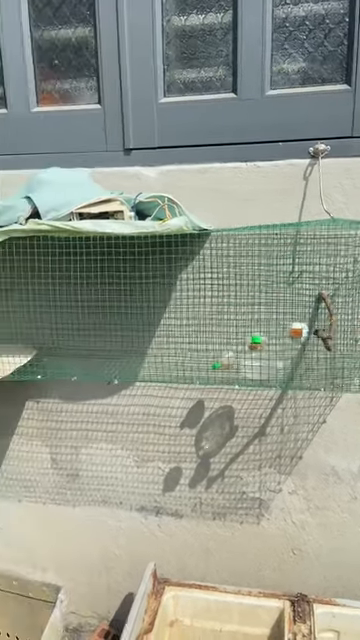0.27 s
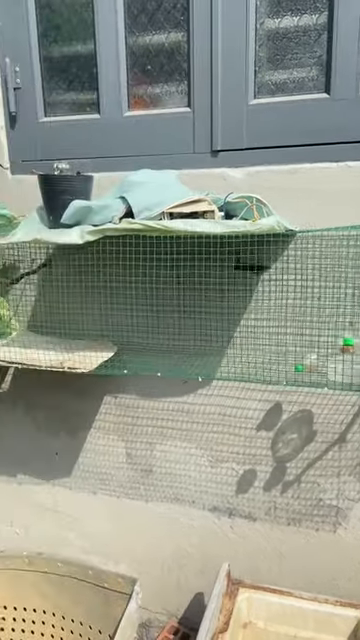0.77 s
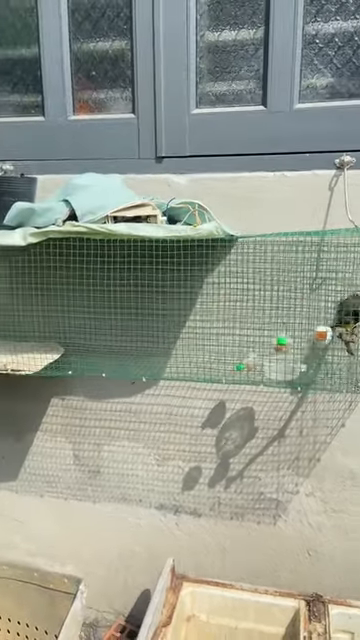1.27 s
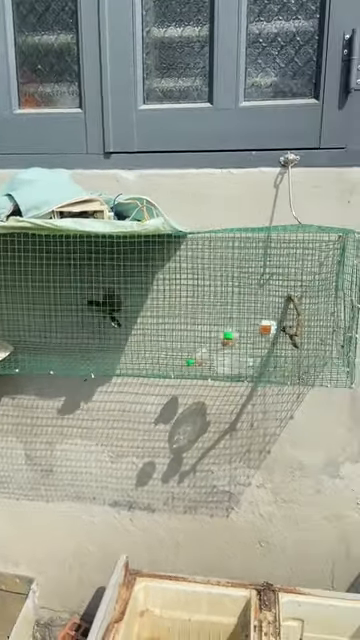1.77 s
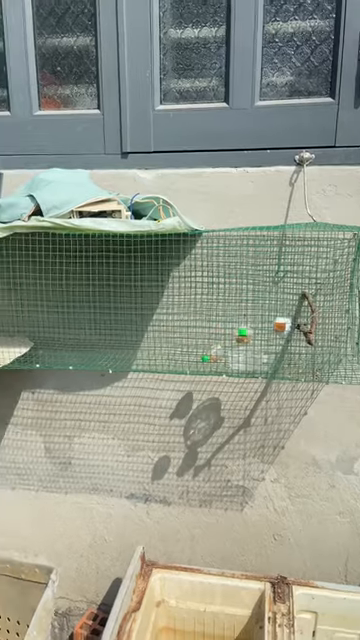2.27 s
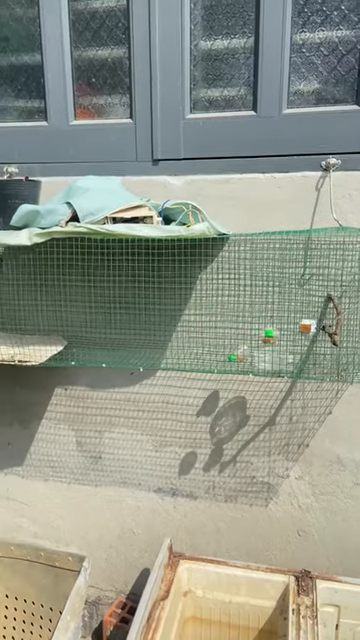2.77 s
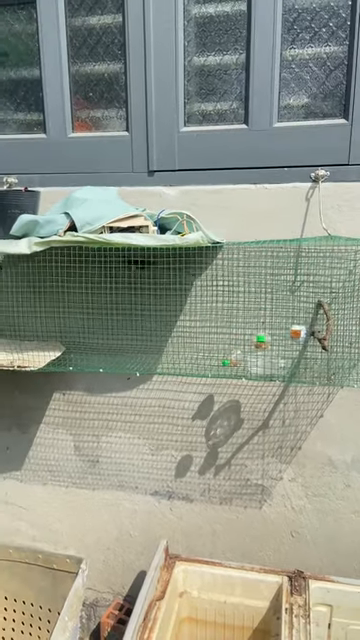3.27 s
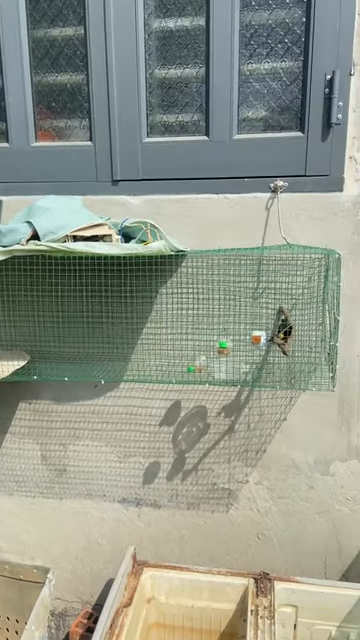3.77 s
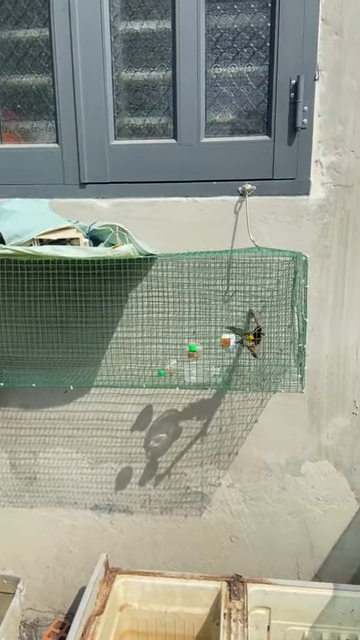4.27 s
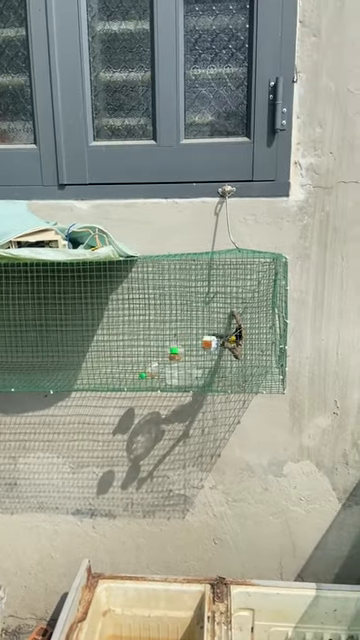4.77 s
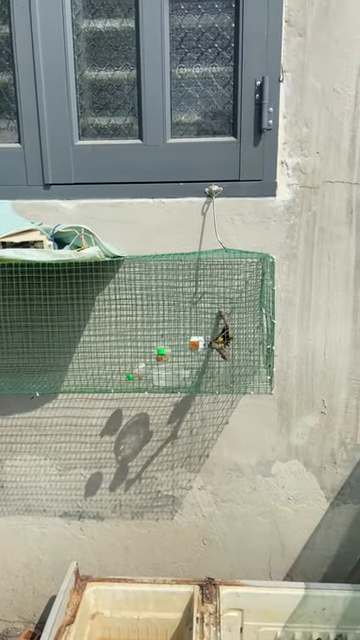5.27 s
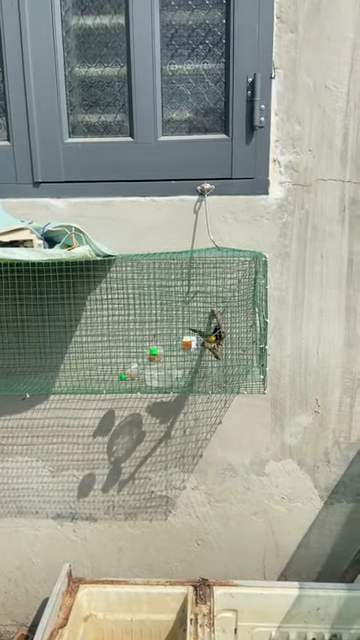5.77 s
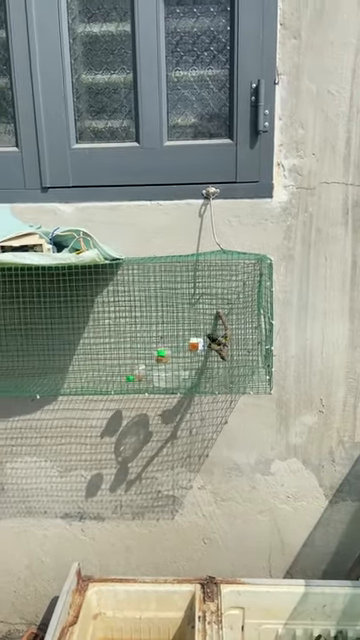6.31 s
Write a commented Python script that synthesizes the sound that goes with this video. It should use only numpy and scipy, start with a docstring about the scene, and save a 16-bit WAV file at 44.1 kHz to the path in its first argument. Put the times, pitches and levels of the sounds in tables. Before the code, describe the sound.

A small caged bird sings nearby in a yard, its notes echoing lightly off a wall, over a steady low town rumble and faint far bird calls. A couple of soft knocks, a quiet falling scold and a short rasp come in the first 0.7 seconds. From about 1 to 2.3 seconds the bird gives six slurred whistles, with another rasp and a faint wing whirr near 1.8. A distant motor hum swells slightly, and a very faint horn toots at 2.6. A rasp and flutter follow at 3.2, with faint shuffling on the perch. At 3.5 a quick, high two-note trill starts and grows, breaking at 4.3 into louder, slower alternating chips and warbles until about 5.8. The wire ticks once at 5.3. After the song, dull bumps sound around 6.2, then a soft wing whirr and tiny wire ticks near 6.5.

```python
"""Caged sunbird on a house wall

A sunbird's syrinx gives a soft scold, rasps and slurred whistles, then a quick two-note trill that breaks into
slower chips and warbles. Its wings whirr, it shuffles and ticks on the wire; wall and yard throw the song back.
Behind it: town rumble, a low hum, faint far calls, one horn and small knocks."""
import sys
import numpy as np
from scipy import signal
from scipy.fft import rfft, irfft
from scipy.io import wavfile

SR = 44100
rng = np.random.default_rng(int(sys.argv[2]) if len(sys.argv) > 2 else 0)


def dump(signal):
    """Clip the signal to [-1, 1] and save it as 16-bit WAV at the path in sys.argv[1]."""
    limited = np.clip(np.atleast_2d(signal).T, -1, 1)
    pcm = np.round(limited * 32767).astype(np.int16)
    wavfile.write(sys.argv[1], SR, pcm)


N = 288414
BAND_LIMIT_HZ = 15850
# chip syllables: start_s, level_db, pitch_ratio, length_ratio
CHIPS = [(4.32, -32.5, 0.96, 0.94), (4.556, -32, .99, 1), (4.802, -30.5, 0.98, 0.96),
         (5.047, -31, 0.97, 0.95), (5.294, -30.5, 0.97, .92), (5.56, -33, .98, 0.99)]
# bright, banded hiss on rough notes and chips: freq_hz, level_db
BRIGHT_HISS = [(1500, -19.5), (3000, -8), (5500, -4), (7400, -12), (8400, 1), (9400, -19), (10500, -4),
               (11900, -4.5), (13000, -37.5), (15000, -8)]


def amp(db):
    """Decibels to gain."""
    return 10 ** (np.asarray(db) / 20)


def unit(x):
    """Scale to rms 1."""
    return x / np.sqrt(np.mean(x ** 2) + 1e-20)


def read(points, hz):
    """Interpolate on a log-frequency axis."""
    f, value = np.transpose(points)
    return np.interp(np.log(hz + 1), np.log(f + 1), value)


def add(mix, start_s, sound):
    """Mix a sound in at start_s."""
    part = mix[max(round(start_s * SR), 0):][:len(sound)]
    part += sound[:len(part)]


def noise(spectrum):
    """Steady coloured noise, rms 1."""
    hz = np.fft.rfftfreq(N, 1 / SR)
    return unit(irfft(rfft(rng.standard_normal(N)) * amp(read(spectrum, hz)), N))


def wobble(rate_hz):
    """Random flutter up to about rate_hz, rms 1."""
    hz = np.fft.rfftfreq(N, 1 / SR)
    return unit(irfft(rfft(rng.standard_normal(N)) * np.exp(-(hz / rate_hz) ** 2), N))


def town(rumble_db=-57.5, side_db=-65, air_db=-79, left_db=-1, right_db=0.3):
    """Low, slightly swelling stereo rumble under thin outdoor hiss."""
    # rumble common to both sides: freq_hz, density_db
    common_spectrum = [(15, -29), (25, 1), (59, 6.5), (103, -5), (261, -17.5), (297, -16), (564, -26.5),
                       (654, -26.5), (845, -60.5), (1410, -29), (2000, -66), (2600, -57), (4400, -120)]
    # left-right difference: freq_hz, density_db
    side_spectrum = [(15, -47), (25, 7.5), (56, 4.5), (145, -13.5), (182, -9), (265, -8.5), (1040, -12.5),
                     (2200, -42.5), (2860, -73.5), (4840, -120)]
    # outdoor hiss: freq_hz, density_db
    air = [(1000, -20), (1600, 8), (3000, 1), (5500, -5), (7500, -20), (15000, -17.5)]
    swell = amp(wobble(5))
    common = amp(rumble_db) * swell * noise(common_spectrum)
    side = amp(side_db) * noise(side_spectrum)
    hiss = amp(air_db) * swell * (noise(air) + .5 * np.array([noise(air), noise(air)]))
    return np.array([amp(left_db) * common + side, amp(right_db) * common - side]) + hiss


def drone(waver=0.013):
    """A low hum wavers, swelling and fading."""
    # hum partials: freq_hz, level_db
    partials = [(185, -69.5), (238, -80.5), (297, -76)]
    # hum swell: time_s, gain_db
    swell_points = [(1.45, -12.5), (1.8, 9), (2.5, -7.5), (4.5, -14), (5.1, 1.5), (6.3, -0.5)]
    warped_s = np.cumsum(1 + waver * wobble(14)) / SR
    swell = amp(np.interp(np.arange(N) / SR, *np.transpose(swell_points)))
    return swell * sum(amp(db) * (1 + .5 * wobble(5.4)) * np.sin(2 * np.pi * hz * warped_s)
                       for hz, db in partials)


def far_calls(width_hz=900):
    """Faint harsh calls, smeared into narrow noise bands."""
    # calls: start_s, length_s, pitch_hz, level_db
    calls = [(0.145, 0.065, 3380, -87), (0.425, 0.19, 5120, -66.5), (0.743, 0.14, 5450, -63),
             (0.898, 0.36, 5090, -65.5), (2.476, 0.21, 5225, -62), (3.022, 0.31, 3410, -73),
             (3.257, 0.24, 5180, -65), (3.66, 0.43, 2645, -66.5), (5.354, 0.093, 3950, -49),
             (6.155, 0.18, 5650, -75.5)]
    out = np.zeros(N)
    grain = wobble(width_hz) + 1j * wobble(width_hz)
    for start_s, length_s, hz, db in calls:
        at = round(start_s * SR) + np.arange(round(length_s * SR))
        band = (grain[at] * np.exp(2j * np.pi * hz * at / SR)).real
        add(out, start_s, amp(db) * signal.windows.tukey(len(at), .6) * band)
    return out


def knocks(rise_s=0.0017):
    """Dull bumps, each one damped low mode."""
    # bumps: start_s, level_db, ring_hz, t60_s
    bumps = [(0.243, -48, 167, 0.1), (0.62, -55, 398, 0.022), (.621, -44.5, 644, 0.019),
             (0.625, -63, 1010, 0.12), (6.213, -38.5, 174, 0.027), (6.217, -41, 63, 0.19),
             (6.297, -35.5, 66.6, 0.1)]
    out, t = np.zeros(N), np.arange(SR // 4) / SR
    for start_s, db, hz, t60_s in bumps:
        envelope = amp(db - 60 * t / t60_s) * (1 - np.exp(-t / rise_s))
        add(out, start_s, envelope * np.sin(2 * np.pi * hz * t))
    return out


def slur(start_s, length_s, from_hz, to_hz, glide_s, attack_s, release_s, db, rough, waver, settle):
    """A note that glides to its pitch and clears as it settles."""
    t = np.arange(round(length_s * SR)) / SR
    arrived = t ** 3 / (t ** 3 + glide_s ** 3)
    hz = from_hz + (to_hz - from_hz) * arrived
    ramp = np.clip(np.minimum(t / attack_s, (length_s - t) / release_s), 0, 1)
    gain = amp(db) * np.sin(np.pi / 2 * ramp) ** 1.11
    return start_s, hz, gain, rough * (1 - settle * arrived), waver


def arch(syllable, shape, edge_s=.0025, soft_db=-11, leak_db=-16.5, flick_db=2, flick_rough=0.31,
         waver=0.0083, scatter_hz=(45, 45, 130)):
    """A quick pitch swing: starts soft, catches, fades; flares at throat resonances, falls rough."""
    # throat resonances: centre_hz, half_width_hz
    resonances = [(4980, 464), (6400, 164)]
    start_s, db, pitch_ratio, stretch = syllable
    delay_s, rise_s, fall_s, from_hz, top_hz, end_hz, catch_s, arch_db, fade_db_per_s, rough = shape
    from_hz, top_hz, end_hz = rng.normal([from_hz, top_hz, end_hz], scatter_hz)
    t = np.arange(round((rise_s + fall_s) * stretch * SR)) / (SR * stretch)
    up = np.sin(np.pi / 2 * np.minimum(t / rise_s, 1)) ** 2
    down = np.maximum((t - rise_s) / fall_s, 0) ** 2
    hz = pitch_ratio * (from_hz + (top_hz - from_hz) * up + (end_hz - top_hz) * down)
    throat = amp(leak_db) + sum(1 / (1 + ((hz - centre) / width) ** 2) for centre, width in resonances)
    onset_db = soft_db * np.clip((catch_s + edge_s - t) / edge_s, 0, 1)
    fade_db = fade_db_per_s * np.maximum(t - catch_s, 0)
    edges = np.minimum(np.minimum(t, t[-1] - t) / edge_s, 1)
    gain = amp(db + arch_db + onset_db - fade_db + flick_db * down) * throat * edges
    return start_s + delay_s * stretch, hz, gain, rough + flick_rough * down, waver


def slurred_notes(whistle_bright_db=-24, scold_bright_db=-17, rasp_bright_db=-1):
    """Scold, rasps and whistles as (note, bright_db); a nearly shut beak dulls the whistles."""
    # soft falling scold:
    # start_s, length_s, from_hz, to_hz, glide_s, attack_s, release_s, level_db, roughness, waver_ratio
    scolds = [(.384, 0.11, 5150, 3513, 0.049, 0.053, 0.059, -50, 1, .011)]
    # slurred whistles: columns as scolds
    whistles = [(0.97, 0.27, 4176, 3527, 0.039, 0.069, 0.12, -40, 0, 0.0081),
                (1.285, .21, 3990, 4172, .058, 0.017, 0.018, -35, 0, 0.0079),
                (1.584, 0.19, 2730, 2967, 0.082, 0.13, .025, -30, .02, 0.0071),
                (1.853, 0.11, 3080, 3385, .018, 0.071, 0.019, -35.5, 0.2, 0.011),
                (2.008, .158, 4680, 2740, .035, 0.028, .03, -35.5, 0.1, .03),
                (2.208, .125, 2980, 3286, 0.018, .05, 0.04, -33.5, .07, .006)]
    # rising rasps: start_s, level_db
    rasps = [(.647, -38), (1.803, -38.5), (3.184, -41.5)]
    # contour of every rasp: length_s, from_hz, to_hz, glide_s, attack_s, release_s
    rasp_shape = (0.061, 4980, 6700, .034, 0.045, 0.0096)
    notes = [(slur(*row, settle=0.89), whistle_bright_db) for row in whistles]
    notes += [(slur(*row, settle=0.14), scold_bright_db) for row in scolds]
    notes += [(slur(start_s, *rasp_shape, db, rough=0.89, waver=.011, settle=.6), rasp_bright_db)
              for start_s, db in rasps]
    return notes


def arched_notes(warble_bright_db=0.5):
    """Trill, chips and warbles as (note, bright_db); each syllable is one or more arches."""
    # arch of the high trill note, before syllable scaling:
    # delay_s, rise_s, fall_s, from_hz, top_hz, end_hz, catch_s, level_db, fade_db_per_s, roughness
    high_shape = [(0, .022, .031, 6430, 7250, 5900, .001, 2, 170, .16)]
    # arches of the low trill note, chip and warble: columns as high_shape
    low_shape = [(.004, .039, 0.015, 4097, 5170, 4185, .02, 3.36, 60.1, 0.056)]
    chip_shape = [(0, .008, .009, 6130, 6280, 5760, .001, -4, 150.2, 0.37),
                  (0, 0.022, .003, 2576, 4586, 4330, 0.00067, -17.5, 50, 0.4007),
                  (.013, .03, .021, 5810, 7070, 6614, .008, 5, 267.5, 0.3)]
    warble_shape = [(0, .013, .022, 4740, 5330, 4300, 0.0023, -8, 150, .17),
                    (.031, .04, .024, 4416, 5597, 3530, 0.013, -0.5, 128.5, 0.069)]
    # trill and warble syllables: start_s, level_db, pitch_ratio, length_ratio
    high_trill = [(3.516, -42.5, 0.94, 1.08), (3.689, -39.5, 0.92, 1.01), (3.849, -37, 0.96, 0.97),
                  (4.01, -36.5, 0.93, 1.02), (4.16, -36, 0.95, 1.07)]
    low_trill = [(3.566, -40.5, 1.032, 0.81), (3.739, -37, 1.006, 0.97), (3.896, -37.5, 1.026, 0.95),
                 (4.058, -37, 1, .97), (4.208, -36, 1.042, 0.88)]
    warbles = [(4.409, -29.5, 0.98, 0.95), (4.648, -30, 0.97, 0.95), (4.893, -29.5, 0.97, 0.96),
               (5.139, -30, 0.97, 0.96), (5.384, -31, .99, .98), (5.662, -31.5, 0.95, 0.98)]
    parts = [(high_shape, high_trill, 0), (low_shape, low_trill, 0),
             (chip_shape, CHIPS, 0), (warble_shape, warbles, warble_bright_db)]
    return [(arch(syllable, shape), bright_db)
            for shapes, syllables, bright_db in parts for syllable in syllables for shape in shapes]


def syrinx(jitter=.05, jitter_hz=700, rasp_hz=900, hiss_db=-19, hiss_rise_s=.012, rough_boost=2.3,
           blur_rad=0.57):
    """A near sine; when rough, it breaks into narrow-band noise with a bright hiss."""
    # faint high sheen added above each note: freq_hz, level_db
    sheen_curve = [(5500, -45), (7000, -48.5), (8300, -27.5), (9300, -45.5), (10200, -32.5), (11100, -28.5),
                   (12000, -31), (13000, -48), (14000, -36), (14900, -27), (16000, -42)]
    out = np.zeros(N)
    flutter, bright_noise, unsteady = wobble(jitter_hz), noise(BRIGHT_HISS), wobble(170)
    chaos = (wobble(rasp_hz) + 1j * wobble(rasp_hz)) / np.sqrt(2)
    blur = blur_rad * wobble(340)
    for (start_s, hz, gain, rough, waver), bright_db in slurred_notes() + arched_notes():
        at = round(start_s * SR) + np.arange(len(hz))
        rough = np.clip(rough, 0, 1)
        swing = np.sqrt(1 - rough ** 2) + rough * chaos[at]
        wavering_hz = hz * (1 + waver * unsteady[at] + jitter * rough * flutter[at])
        phase = 2 * np.pi * np.cumsum(wavering_hz) / SR + np.angle(swing)
        sheen = sum(amp(read(sheen_curve, k * hz)) * (k * hz < BAND_LIMIT_HZ)
                    * np.sin(k * phase + blur[at]) for k in (2, 3))
        hiss = amp(hiss_db) * rough * bright_noise[at] * np.minimum((at - at[0]) / (hiss_rise_s * SR), 1)
        treble = (1 + rough_boost * rough) * sheen + hiss
        add(out, start_s, np.sqrt(2) * gain * abs(swing) * (np.sin(phase) + amp(bright_db) * treble))
    return out


def wings(beat_hz=26):
    """Soft puffs of air, one per wingbeat."""
    # flits across the cage: start_s, length_s, level_db
    flights = [(1.747, 0.21, -67), (3.164, 0.19, -69.5), (6.402, 0.2, -67)]
    # wing whirr: freq_hz, level_db
    whirr = [(90, -25.5), (190, -2.5), (420, -11.5), (900, -19), (1800, -38), (4000, -70)]
    gate = np.zeros(N)
    for start_s, length_s, db in flights:
        add(gate, start_s, amp(db) * np.hanning(round(length_s * SR)))
    beats = 1 + np.sin(2 * np.pi * beat_hz * np.arange(N) / SR)
    return gate * unit(noise(whirr) * beats)


def horn(start_s=2.63, length_s=0.174):
    """One short toot from a distant street."""
    # horn partials: freq_hz, level_db
    partials = [(646, -71), (1976, -84)]
    out, t = np.zeros(N), np.arange(round(length_s * SR)) / SR
    tone = sum(np.sqrt(2) * amp(db) * np.sin(2 * np.pi * hz * t) for hz, db in partials)
    add(out, start_s, signal.windows.tukey(len(t), .4) * tone)
    return out


def shuffle(start_s=2.8, length_s=2.6, db=-75, ring_hz=880, t60_s=.07, spread=0.29, rise_s=.006,
            count=40):
    """The bird shifts on its perch: faint random bumps, each ringing a different part of the cage."""
    out, t = np.zeros(N), np.arange(SR // 8) / SR
    envelope = amp(db - 60 * t / t60_s) * (1 - np.exp(-t / rise_s))
    for when, size, tuning in rng.random((count, 3)):
        hz = ring_hz * (1 + spread * (2 * tuning - 1))
        add(out, start_s + when * length_s, 2 * size * envelope * np.sin(2 * np.pi * hz * t))
    return out


def spits(relative_db=-20, length_s=0.04, lead_s=0.012):
    """A bright, crackly spit of hiss opens each chip before the tone catches."""
    gate = np.zeros(N)
    for start_s, db, *_ in CHIPS:
        add(gate, start_s - lead_s, amp(db + relative_db) * signal.windows.tukey(round(length_s * SR), .7))
    hiss = np.gradient(noise(BRIGHT_HISS))
    crackle = amp(2.8 * wobble(250.15))
    return gate * unit(hiss * crackle)


def ticks(t60_s=0.0063, width_hz=1100):
    """Claws and beak on the wire: very short noisy rings."""
    # wire taps: start_s, level_db, ring_hz
    taps = [(5.341, -40.5, 4100), (6.207, -53, 4150), (6.482, -53.5, 2100), (6.512, -57, 2110)]
    out, t = np.zeros(N), np.arange(SR // 50) / SR
    grain = wobble(width_hz)
    for start_s, db, hz in taps:
        ring = grain[round(start_s * SR):][:len(t)] * np.sin(2 * np.pi * hz * t)
        add(out, start_s, amp(db - 60 * t / t60_s) * ring)
    return out


def wall(x):
    """Direct sound plus first reflections."""
    # off wall, sill and ground: left_delay_ms, right_delay_ms, level_db
    echoes = [(1.05, 1.2, -43.5), (3.6, 3.58, -6), (6.0, 6.05, -34.5), (12.9, 15, -17.5)]
    response = np.zeros((2, SR // 20))
    response[:, 0] = 1
    for left_ms, right_ms, db in echoes:
        response[0, round(left_ms * SR / 1000)] += amp(db)
        response[1, round(right_ms * SR / 1000)] += amp(db)
    return signal.fftconvolve(x[None], response, axes=1)[:, :N]


def yard(x, near_db, near_t60_s, tail_db, delay_s=.007, width=0.41):
    """Nearby scatter dies quickly; the yard rings on, shorter in the treble."""
    # yard decay: freq_hz, t60_s
    decay = [(2500, .42), (4000, 0.61), (5200, 0.33), (6200, 0.23), (7500, 0.29), (15000, 0.16)]
    common, side = rng.standard_normal((2, SR))
    stereo = np.array([common + width * side, common - width * side])
    hz, t, spectra = signal.stft(stereo, SR, nperseg=256)
    response = 0
    for db, t60_s in [(near_db, near_t60_s), (tail_db, read(decay, hz)[:, None])]:
        part = signal.istft(spectra * amp(-60 * t / t60_s), SR, nperseg=256)[1]
        song_band = abs(rfft(part[0], SR))[3000:6500]  # 1 Hz bins
        response = response + amp(db) * part / np.sqrt(np.mean(song_band ** 2))
    response = np.pad(response, ((0, 0), (round(delay_s * SR), 0)))
    return signal.fftconvolve(x[None], response, axes=1)[:, :N]


def scene(song_db=-4.5, far_wet_db=8):
    """The bird before the wall, with yard and town around it."""
    # bird's place as it hops about: time_s, left_minus_right_db
    places = [(.5, -0.5), (1.301, -0.3), (1.698, -1), (2.248, 2.5), (3.199, 0), (5.798, 0)]
    pan_db = np.interp(np.arange(N) / SR, *np.transpose(places))
    cage = amp(song_db) * (syrinx() + spits()) + ticks()
    calls = far_calls()
    near = wall(cage) + yard(cage, near_db=-13, near_t60_s=0.084, tail_db=-9)
    near *= amp(np.array([pan_db, -pan_db]) / 2)
    far = .5 * calls + amp(far_wet_db) * yard(calls, near_db=-33.5, near_t60_s=0.096, tail_db=-16.5)
    return near + far + wings() + knocks() + horn() + drone() + town() + shuffle()


def record(dry, low_cut_hz=44):
    """Low cut and band limit."""
    highpass = signal.butter(4, low_cut_hz, "high", fs=SR, output="sos")
    lowpass = signal.firwin(511, BAND_LIMIT_HZ, window=("kaiser", 9), fs=SR)
    return signal.oaconvolve(signal.sosfilt(highpass, dry), lowpass[None], "same")


dry = scene()
out = record(dry)
dump(out)
```